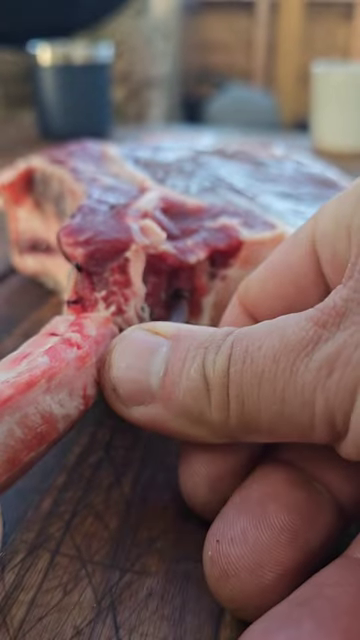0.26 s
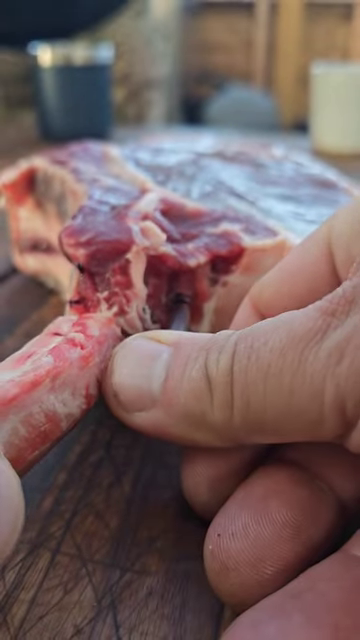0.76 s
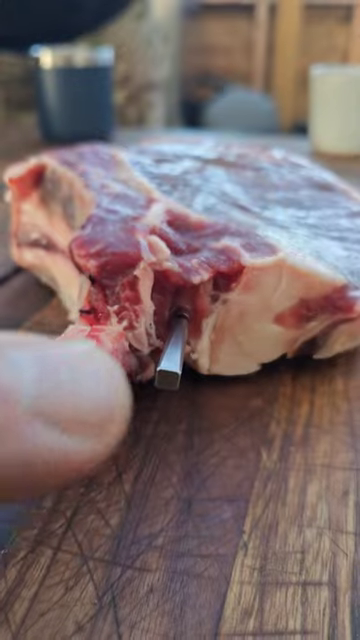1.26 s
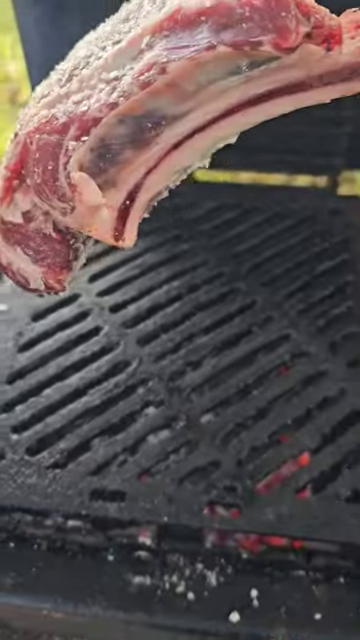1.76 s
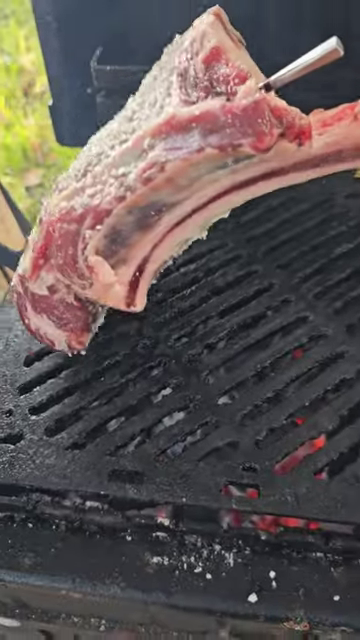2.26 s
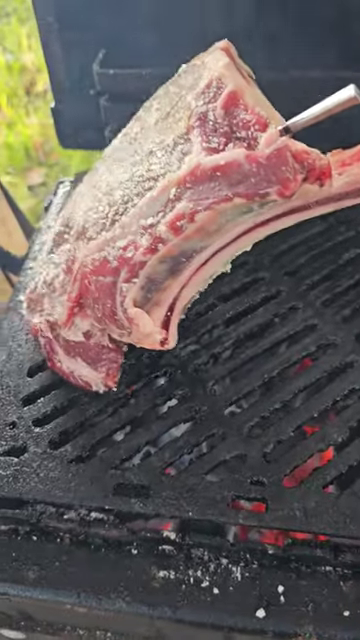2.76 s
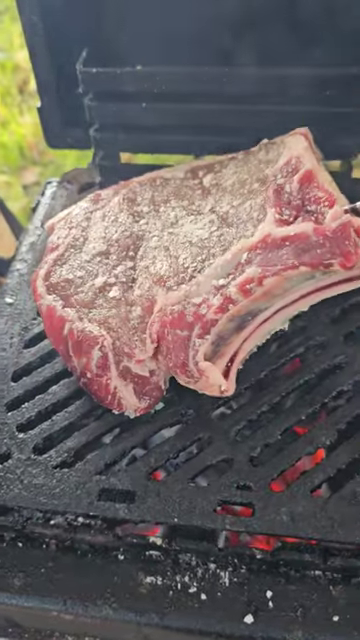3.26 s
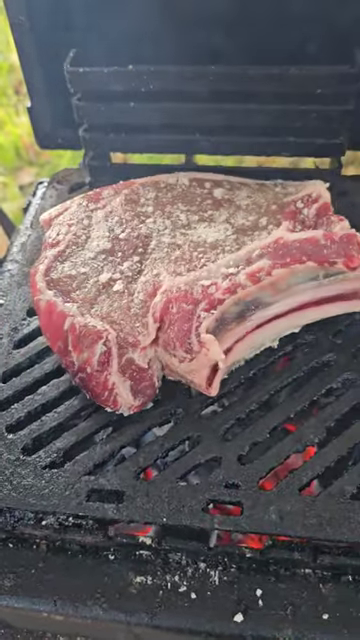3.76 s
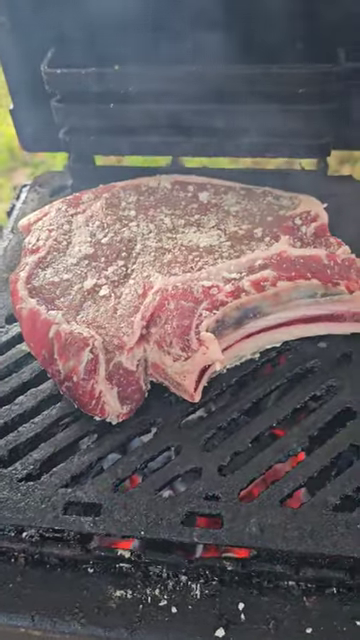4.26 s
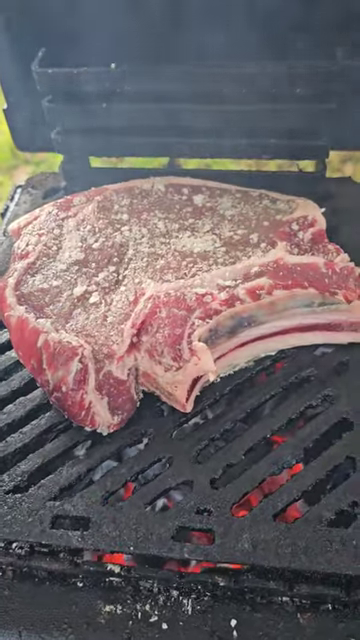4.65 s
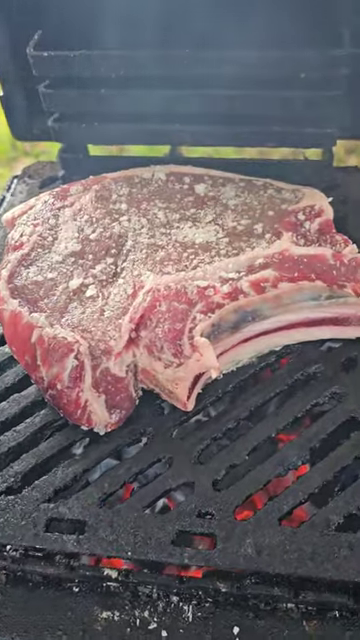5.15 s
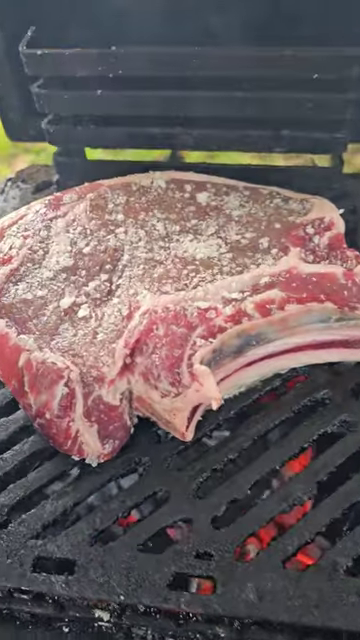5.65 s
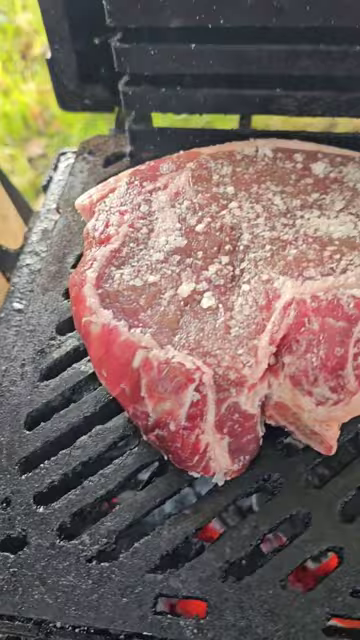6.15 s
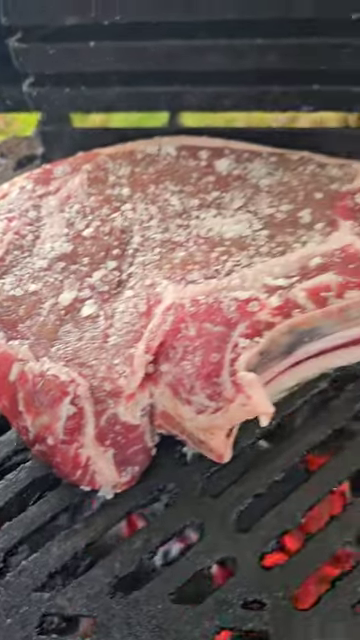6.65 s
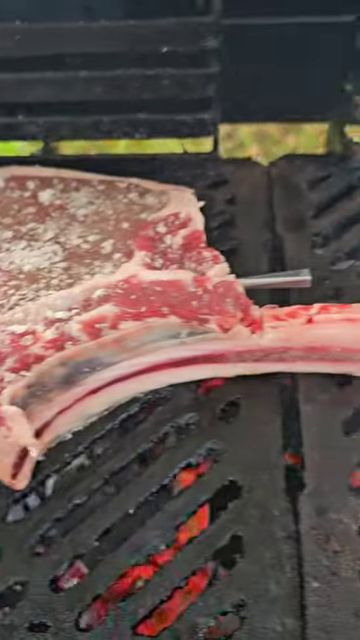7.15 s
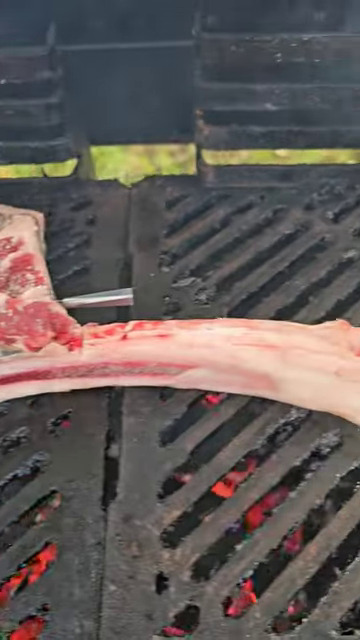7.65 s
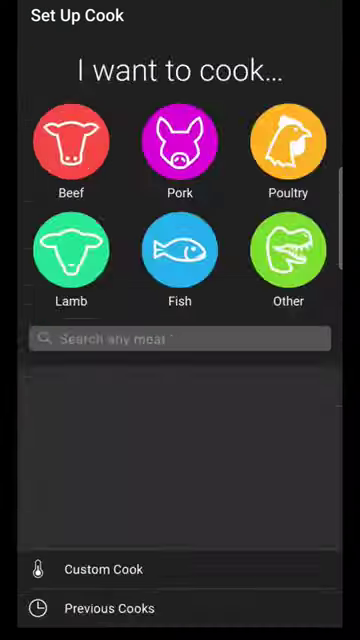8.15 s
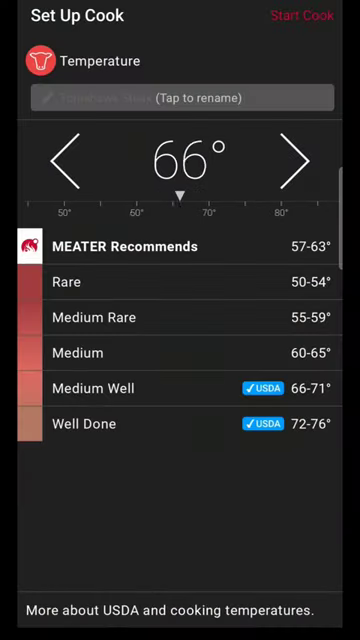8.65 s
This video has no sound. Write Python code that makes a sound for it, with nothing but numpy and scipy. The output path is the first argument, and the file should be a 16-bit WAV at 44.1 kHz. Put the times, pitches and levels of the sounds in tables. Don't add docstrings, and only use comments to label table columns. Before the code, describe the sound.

Distant road roar and low engine drone, a few wet rubs of raw meat, then a steak lands and hisses finely with sharp fat pops.

```python
import sys
import numpy as np
from scipy import signal
from scipy.fft import rfft, irfft
from scipy.io import wavfile
from scipy.ndimage import uniform_filter1d, minimum_filter1d

SR = 44100
rng = np.random.default_rng(int(sys.argv[2]) if len(sys.argv) > 2 else 0)


def ratio_of_db(decibels):
    return 10 ** (np.asarray(decibels, float) / 20)


def output_pcm(signal):
    pcm = np.clip(np.atleast_2d(signal).T, -1, 1) * 32767
    wavfile.write(sys.argv[1], SR, np.round(pcm).astype(np.int16))


N = 392842

# [f/Hz, level/dB]
HISS_SIDE = [(2000, 5), (3500, -0.1), (5500, -1.4), (7000, 1.5), (9000, -2), (11500, -4.5), (13000, -1.5),
             (15000, -12.5)]


def evened(x):
    return x / np.sqrt(np.mean(x ** 2) + 1e-20)


def read(points, hz):
    f, value = np.transpose(points)
    return np.interp(np.log(hz + 1), np.log(f + 1), value)


def column(rows, index, t, before=None):
    rows = np.asarray(rows, float)
    return np.interp(t, rows[:, 0], rows[:, index], left=before)


def resonance(hz, centre_hz, half_hz):
    return 1 / (1 + ((hz - centre_hz) / half_hz) ** 2)


def sides(side_db):
    return ratio_of_db([[side_db / 2], [-side_db / 2]])


def layer(events):
    track = np.zeros((2, N))
    for s, sound in events:
        part = track[:, round(s * SR):][:, :sound.shape[1]]
        part += sound[:, :part.shape[1]]
    return track


def noise(field_db, side_db, patchy_db, drift_db, flicker_db, size=1024, count=None):
    # [f/Hz, correlation]
    likeness = [(60, 0.96), (130, 0.98), (290, 0.79), (640, 0.45), (1410, -0.12), (3100, 0.15),
                (6820, -0.034), (15000, -0.062)]
    hop = size // 4
    hz = np.fft.rfftfreq(size, 1 / SR)[:count, None]
    t = np.arange(N // hop + 5) * hop / SR
    a, b, c, d, chance = rng.standard_normal((len(t), len(hz), 5)).T
    patches = uniform_filter1d(uniform_filter1d(chance, size=12, axis=0), size=10, axis=1)
    drifts = uniform_filter1d(uniform_filter1d(patches, size=20, axis=0), size=120, axis=1)
    flicker = uniform_filter1d(rng.standard_normal(len(t)), size=3)
    uneven_db = patchy_db * evened(patches) + drift_db * evened(drifts) + flicker_db * evened(flicker)
    gain = ratio_of_db(field_db(hz, t) + uneven_db)

    same = np.clip(read(likeness, hz), -1, 1)
    left = a + 1j * b
    right = same * left + np.sqrt(1 - same ** 2) * (c + 1j * d)
    z = np.zeros((2, size // 2 + 1, len(t)), complex)
    z[0, :count] = gain * ratio_of_db(side_db(hz) / 2) * left
    z[1, :count] = gain * ratio_of_db(-side_db(hz) / 2) * right
    return evened(signal.istft(z, nperseg=size, noverlap=size - hop)[1][:, :N])


def road():
    # [t/s, roar level/dB]
    traffic = [(0, -59.5), (1.3, -58), (1.62, -56.5), (1.7, -55.5), (2.1, -57), (2.35, -55), (3.8, -54.5),
               (5.3, -52.5), (7.1, -51), (7.9, -52), (8.25, -51)]
    # [f/Hz, density/dB]
    roar_points = [(240, -39), (400, -4), (715, -2.5), (1120, -6), (1260, -5), (1630, -8.5), (1790, -13),
                   (2750, -19.5), (5390, -28.5), (6380, -28.5), (8500, -41.5), (11800, -39.5), (15500, -42)]
    rumble_points = [(12, -50.5), (20, -17.5), (36, -8), (54, -4.5), (66, -5), (97, -11), (110, -7.5),
                     (140, -42.5), (240, -120)]
    drone_points = [(47, -30), (80, 5), (97, -11), (140, -3), (230, -9.5), (333, -13.5), (377, -22.5),
                    (411, -27.5), (520, -17), (680, -60.5), (1140, -120)]
    # [f/Hz, level/dB]
    road_side = [(60, 0.5), (180, 0), (550, 0), (1650, 1.5), (4970, 2), (15000, -5)]
    # [peak t/s, half length/s, level/dB]
    singing = [
        (0.103, .9, 6.5),
        (2.3, 0.16, 6),
        (3.15, 0.59, 6),
        (6.973, 0.22, 8.5),
    ]

    def side_db(hz):
        return read(road_side, hz)

    def roar_db(hz, s):
        whine_db = 0.5 + sum(db * resonance(s, at, half) for at, half, db in singing)
        body_db = 3.5 - 0.86 * s
        return read(roar_points, hz) + whine_db * resonance(hz, 1900, 250) + body_db * resonance(hz, 650, 350)

    roar = noise(roar_db, side_db, patchy_db=1.1, drift_db=.5, flicker_db=.3)
    rumble = noise(lambda hz, s: read(rumble_points, hz), side_db,
                   patchy_db=5.0, drift_db=-1.4, flicker_db=1.5, size=4096, count=30)
    drone = noise(lambda hz, s: read(drone_points, hz), side_db,
                  patchy_db=0.7, drift_db=2.5, flicker_db=0.3, size=2048, count=60)
    thick_db = column(traffic, 1, np.arange(N) / SR)
    more_db = thick_db + 55
    return ratio_of_db(thick_db) * roar + ratio_of_db(-49.5 + 0.4 * more_db) * rumble + ratio_of_db(-52.5 - 0.24 * more_db) * drone


def wavering(hz, wander, smear_db, slow):
    drift, flutter = rng.standard_normal((N // slow + 1, 2)).T
    drift = evened(uniform_filter1d(drift, size=250))
    flutter = evened(uniform_filter1d(uniform_filter1d(flutter, size=190), size=190))
    phase = 2 * np.pi * np.cumsum(hz * (1 + wander * drift)) * slow / SR
    return np.sqrt(2) * np.sin(phase) * ratio_of_db(smear_db * flutter)


def engines():
    # [t/s, firing f/Hz, level/dB]
    climbing = [(0.0, 99, -65), (0.012, 99, -44), (0.086, 102.9, -51), (0.602, 107.2, -47.5),
                (1.03, 111.6, -50), (1.42, 112.3, -50.5), (1.52, 103.5, -49), (1.63, 103, -68)]
    hauling = [(1.66, 63.5, -41.5), (1.702, 64.8, -45.5), (1.804, 63.3, -48.5), (2.002, 63.9, -38.5),
               (2.08, 62.8, -61), (2.092, 64.2, -48), (2.41, 63.8, -39), (3.114, 66.7, -45.5),
               (3.2, 69.7, -65)]
    # [multiple of firing f, level/dB]
    climbing_orders = [(.5, -4), (1, 0)]
    hauling_orders = [(1, 0)]
    # [f/Hz, level/dB]
    idle_lines = [(135, -64.5), (202, -72.5), (270, -73.5), (303, -71.5), (336, -67), (406, -75)]
    # [t/s, level/dB]
    idle_level = [(1.64, -9), (2.1, -0.1), (5.5, 2), (6.5, 0.5), (7.3, -5)]
    # [start t/s, end t/s, first f/Hz, last f/Hz, top level/dB]
    passes = [
        (0, .9, 153, 164, -55),
        (1.67, 2.04, 199, 200, -58),
        (1.64, 2.7, 140.5, 138.5, -54),
        (2.4, 3.1, 270, 275, -61),
        (4.5, 6.3, 70.5, 72.5, -49),
        (4.4, 6.1, 57, 52.5, -49),
        (6.3, 8.4, 53, 54, -47),
    ]
    slow = 16
    t = np.arange(N // slow + 1) * slow / SR
    idle = sum(ratio_of_db(db) * wavering(hz, .005, 4, slow) for hz, db in idle_lines)
    out = ratio_of_db(column(idle_level, 1, t, before=-92)) * idle

    runs = [(climbing, climbing_orders), (hauling, hauling_orders)]
    for a, b, first_hz, last_hz, db in passes:
        middle = ((a + b) / 2, (first_hz + last_hz) / 2, db)
        runs.append(([(a, first_hz, db - 4), middle, (b, last_hz, db - 4)], hauling_orders))
    throb = ratio_of_db(5 * np.cos(2 * np.pi * 4.8 * (t - 8.6)) * (t > 7.65))
    for rows, orders in runs:
        sounding = uniform_filter1d(((t > rows[0][0]) & (t < rows[-1][0])) * throb, size=90)
        for k, db in orders:
            tone = wavering(k * column(rows, 1, t), .008, 2.2, slow)
            out += sounding * ratio_of_db(column(rows, 2, t) + db) * tone
    return signal.resample_poly(out, slow, 1)[:N] * ratio_of_db([[.3], [-.3]])


def grill_db(hz, facing=1):
    # [f/Hz, density/dB]
    hiss_points = [(1180, -38), (2000, -8.5), (2440, -12.5), (3100, -4), (3970, -2), (7230, -1),
                   (11500, -6.5), (12900, -6), (14900, 3), (15500, -7.5)]
    # [f/Hz, width/Hz, level/dB]
    port_peaks = [(6400, 240, 1.5), (9300, 85, 8), (11470, 520, 10.5), (14690, 550, -17)]
    return read(hiss_points, hz) + facing * sum(db * resonance(hz, f, width / 2) for f, width, db in port_peaks)


def shares_db(hz, low_db, top_db):
    low = np.clip((5600 - hz) / 1500, 0, 1)
    top = np.clip((hz - 9000) / 2100, 0, 1)
    return low * low_db + top * top_db


def burst(db, low_db, top_db, side_db, t60_s, crack_db, echo_db, tail_db):
    t = np.arange(8192) / SR
    fall = ratio_of_db(crack_db - 60 * t / 0.0082)
    fall += ratio_of_db(-60 * t / np.clip(t60_s, .005, 1))
    fall += ratio_of_db(tail_db - 60 * t / 0.58)
    fall += ratio_of_db(echo_db - 60 * abs(t - .008) / .03) * (t > .0065)
    hz = np.fft.rfftfreq(len(t), 1 / SR)
    colour = ratio_of_db(shares_db(hz, low_db, top_db) + 0.82 * grill_db(np.clip(hz, 4000, 15000)))
    colour = colour * hz ** 2 / (hz ** 2 + 1500 ** 2)
    colour = colour * ratio_of_db(np.outer([.5, -.5], read(HISS_SIDE, hz)))
    x = evened(irfft(rfft(rng.standard_normal((2, len(t)))) * colour, len(t)))
    return ratio_of_db(db) * sides(side_db) * x * fall * np.minimum(t / 0.00022, 1)


def rubs():
    # [t/s, peak level/dB, low share/dB, top share/dB, left minus right/dB]
    wet_rubs = [
        (0.0543, -48, 5, 1, -6),
        (0.599, -39.5, 9, -7, -4),
        (0.83, -42.5, -1, -2, -2),
        (0.943, -54.5, 2, -6, -19),
        (1.0694, -63, 13, -19, 0.5),
        (1.5185, -64.5, -1, -9, -21),
    ]
    return layer((s, burst(db - 24.5, *colour, t60_s=.26, crack_db=11, echo_db=-25, tail_db=-12))
                 for s, db, *colour in wet_rubs)


def ring(db, hz, t60_s, side_db):
    t = np.arange(int(.4 * SR)) / SR
    spread, turn = rng.uniform(-0.63, 0.6, (5, 2, 1)).transpose(1, 0, 2)
    modes = np.sin(2 * np.pi * (hz * (1 + .12 * spread) * t + turn)).sum(0) / 2
    return ratio_of_db(db - 60 * t / t60_s) * sides(side_db) * modes * np.minimum(t / (0.026 * t60_s), 1)


def rings():
    # [t/s, peak level/dB, f/Hz, t60/s, left minus right/dB]
    struck = [
        (0.829, -55, 6640, 0.041, -10),
        (.84, -67, 6800, .2, -11),
        (1.06, -70, 4300, .15, .3),
        (1.686, -53.5, 6150, 0.036, 12),
        (1.69, -62, 3920, 0.064, -13),
        (1.90, -71, 7440, 0.31, -8),
        (2.44, -34.5, 100, 0.13, 1.8),
        (7.1294, -38, 2300, 0.011, 10),
        (7.128, -43.5, 1003, 0.026, 1),
        (7.13, -41.5, 622, 0.04, 0),
    ]
    return layer((s, ring(*modes)) for s, *modes in struck)


def snap(db, low_db, top_db, side_db, t60_s):
    return burst(db - 4.5, low_db, top_db, side_db, t60_s, crack_db=4, echo_db=-16, tail_db=-28)


def spatter(rows, t60_s):
    return layer((s + .0005, snap(db, -3 - bright_db, -3 + bright_db, side_db, t60_s))
                 for s, db, bright_db, side_db in rows)


def ticks():
    # [t/s, peak level/dB, low share/dB]
    salt = [
        (1.6681, -57, -14),
        (1.6857, -51.5, -11),
        (1.9293, -62, -3),
        (2.0478, -60, 6),
        (2.1944, -64, -5),
        (2.2709, -57, 7),
        (2.377, -49, -2),
        (2.4023, -54, -2.5),
    ]
    return layer((s + .0005, snap(db, low_db, -8.5, 0, .038)) for s, db, low_db in salt)


def spurts():
    # [t/s, peak level/dB, brightness/dB, left minus right/dB]
    wet_spurts = [
        (1.7639, -55.5, -3, -1),
        (2.5016, -43, 8, 5),
        (4.7577, -37, -9, 0),
        (5.9503, -42.5, -2, 0.2),
        (6.481, -38, 4, -0.5),
    ]
    return spatter(wet_spurts, t60_s=.11)


def sizzle():
    # [t/s, hiss level/dB, treble lift/dB]
    boil = [(2.3, -80, -8.5), (2.37, -76.5, -7.5), (2.47, -66, 9), (2.6, -62.5, 3), (2.89, -60, 5),
            (3.23, -62, 1.5), (3.8, -54.5, 0), (4.2, -56, 0), (4.71, -56, 3), (5.22, -58, 3), (5.6, -57, 1),
            (6.4, -58, 2.5), (6.8, -58, 1.5), (7.6, -58, -0.3), (8.2, -58, -0.3)]
    # [t/s, share of port peaks]
    port_facing = [(2.4, 0.87), (5.3, 0.59), (5.8, 0.86), (8.3, 0.53)]
    # [t/s, f/Hz]
    echo_notch = [(2.4, 3203), (3.5, 3246), (4.05, 5040), (4.4, 4600), (5.0, 4050), (5.9, 3970),
                  (6.7, 4160), (7.1, 3490), (8.3, 3510)]

    def field_db(hz, s):
        lift_db = column(boil, 2, s)
        notch_db = -6.5 * resonance(hz, column(echo_notch, 1, s), 300)
        bubbles_db = shares_db(hz, -1 + .2 * lift_db, lift_db)
        return grill_db(hz, column(port_facing, 1, s)) + notch_db + bubbles_db

    hiss = noise(field_db, lambda hz: read(HISS_SIDE, hz), patchy_db=.9, drift_db=.8, flicker_db=.4, size=512)
    spits_per_s, spit_decay_s = 130, .0009
    large = ratio_of_db(4.5 * np.minimum(rng.exponential(1, N), 3)) * (rng.random(N) < spits_per_s / SR)
    spits = signal.lfilter([1], [1, -np.exp(-1 / (spit_decay_s * SR))], large)
    level_db = column(boil, 1, np.arange(N) / SR, before=-130) + 6.5
    return ratio_of_db(level_db) * hiss * (1 + .3 * spits)


def pops():
    # [t/s, peak level/dB, brightness/dB, left minus right/dB]
    fat_pops = [(2.9517, -42.5, 0.5, 3), (3.0213, -40.5, 3, -1), (3.064, -38, 5.5, 1), (3.1524, -49, 4, -2),
                (3.9848, -32, 4, 1), (4.37, -34.5, -0.5, 0), (4.4324, -32.5, -4, -0.5),
                (4.5885, -41, 1, -5), (4.8996, -46, -9, 1), (4.9551, -43, 6, -7.5), (5.1048, -44, -3, -1),
                (5.1604, -42, 4, -1), (5.1894, -44, 5, 0.2), (5.6899, -41, 1, 0), (5.9728, -35.5, -1, -2),
                (6.7994, -43, -9, -1.7), (7.1294, -22, -4, 0.5), (7.2608, -43, 8, -8), (7.3218, -42, 0, -3),
                (7.3511, -41.5, 0, -1), (7.3986, -43, 2, -6), (7.5873, -33, 4, 0.8), (7.6355, -42.5, 1, 2),
                (7.7707, -40, 2, 3), (7.8094, -43.5, 1, 2), (7.8466, -42.5, 9, -4), (7.9663, -40.5, 2, 1),
                (7.9825, -38, -3.5, 0)]
    return spatter(fat_pops, t60_s=.038)


def scene():
    return road() + engines() + rubs() + rings() + ticks() + spurts() + sizzle() + pops()


def starved(x):
    under_db, sparse_db, quiet_db, chance_db = -8.6, -6, -37, 3.8
    low_hz, high_hz, edge_hz = 2500, 5700, 15650
    width = 10
    hz, t, z = signal.stft(x, SR, window="cosine", nperseg=2048, noverlap=1024)
    lines = (abs(z) ** 2).mean(0)[:-5]
    power = lines.reshape(-1, width, len(t)).mean(1)
    centre = hz[:-5].reshape(-1, width).mean(1)[:, None]
    chance = uniform_filter1d(rng.standard_normal(power.shape), size=3)
    chance = chance + .2 * rng.standard_normal(power.shape)
    level_db = 10 * np.log10(power + 1e-20) + chance_db * evened(chance)

    def mean_db(lo, hi):
        band = (centre[:, 0] > lo) & (centre[:, 0] < hi)
        return 10 * np.log10(power[band].mean(0) + 1e-20)

    treble_db, road_db = mean_db(6000, edge_hz), mean_db(500, 2000)
    hiss_db = minimum_filter1d(treble_db, size=5)
    middle = (centre > low_hz) & (centre < high_hz)
    high = centre > high_hz

    under_hiss = (level_db < hiss_db + under_db + 5 * centre / high_hz) & middle
    under_hiss |= (level_db < hiss_db + under_db - .7) & high & (centre < 14000)
    under_road = (level_db < minimum_filter1d(road_db, size=5) + quiet_db) & high
    gain = np.where(under_hiss, ratio_of_db(-50), 1) * np.where(under_road, ratio_of_db(-13), 1)

    thin = (lines < ratio_of_db(2 * (hiss_db + sparse_db))) & np.repeat(middle, width, axis=0)
    loud_hiss = hiss_db > road_db + quiet_db + 20
    thin |= (lines < ratio_of_db(2 * (hiss_db + sparse_db - 3))) & np.repeat(high, width, axis=0) & loud_hiss
    z[:, :-5] *= np.repeat(gain, width, axis=0) * np.where(thin, ratio_of_db(-30), 1)

    z[:, hz > edge_hz] *= np.where(treble_db > hiss_db + 7, ratio_of_db(-30), ratio_of_db(-55))
    z[:, hz > 16800] = 0
    return signal.istft(z, SR, window="cosine", nperseg=2048, noverlap=1024)[1][:, :N]


def roll_off(x):
    return signal.sosfilt(signal.butter(12, 16790, fs=SR, output="sos"), x)


def record(dry):
    t = np.arange(N) / SR
    change_s, dip_s, end_s = 1.6422, .013, 8.268
    dip = uniform_filter1d(((t > change_s) & (t < change_s + dip_s)) * 1., size=90)
    click = ratio_of_db(-49) * (abs(t - change_s) < .5 / SR)
    joined = dry * ratio_of_db(-6 * dip) + click
    x = signal.sosfilt(signal.butter(2, 28, "highpass", fs=SR, output="sos"), joined)
    x = starved(x) * np.clip((end_s - t) / 0.00057, 0, 1)
    return roll_off(x)


dry = scene()
out = record(dry)
output_pcm(out)
```